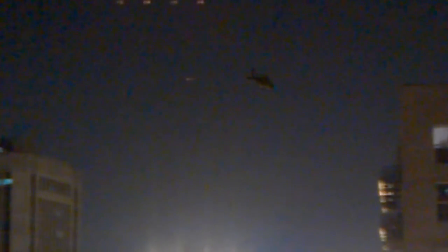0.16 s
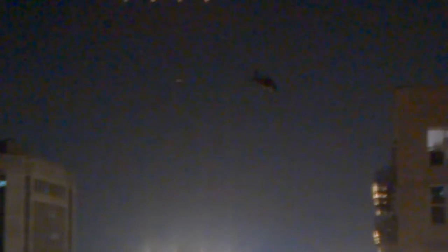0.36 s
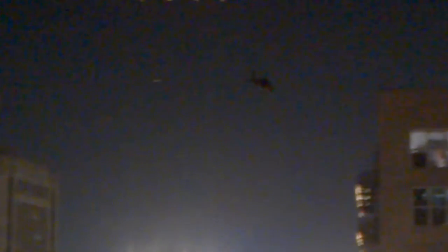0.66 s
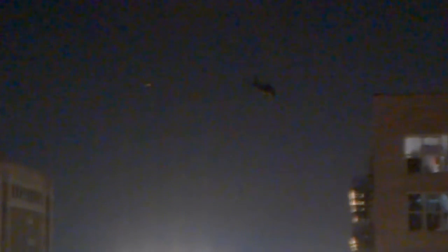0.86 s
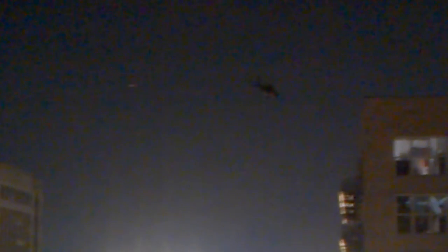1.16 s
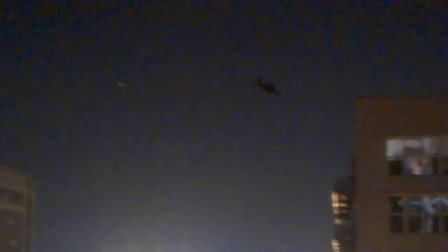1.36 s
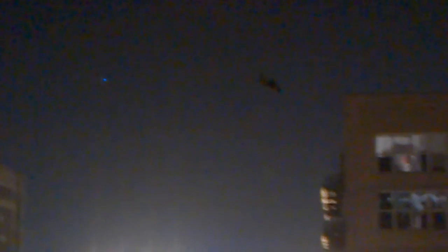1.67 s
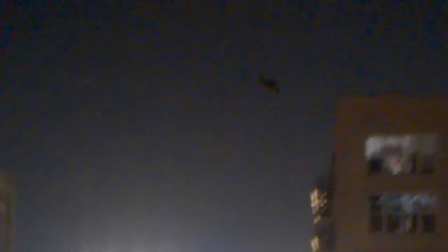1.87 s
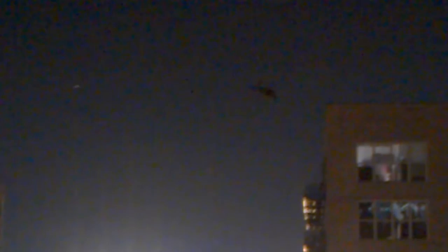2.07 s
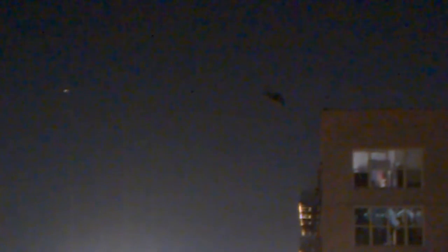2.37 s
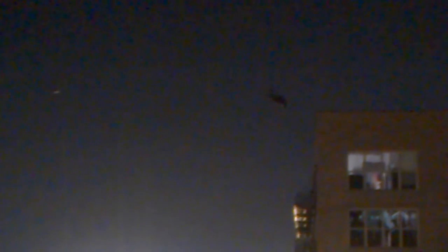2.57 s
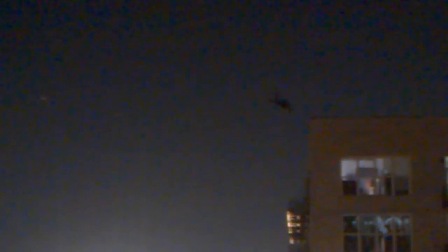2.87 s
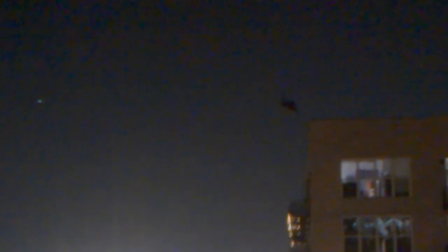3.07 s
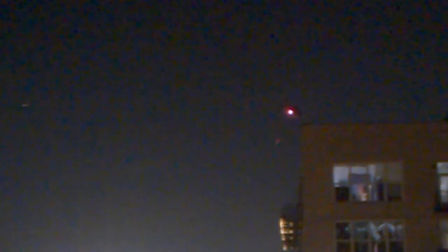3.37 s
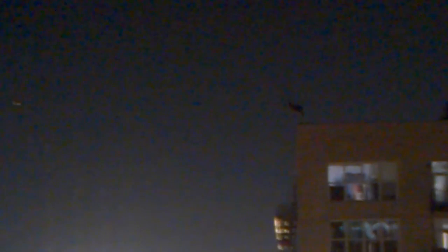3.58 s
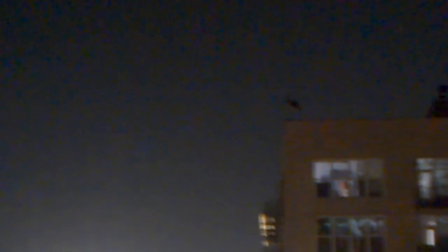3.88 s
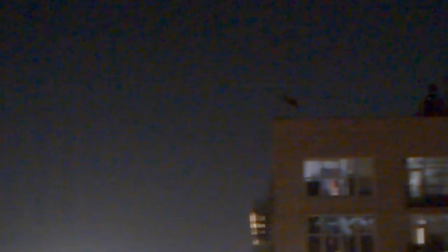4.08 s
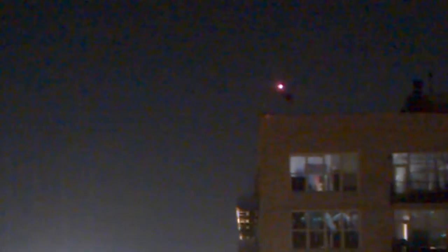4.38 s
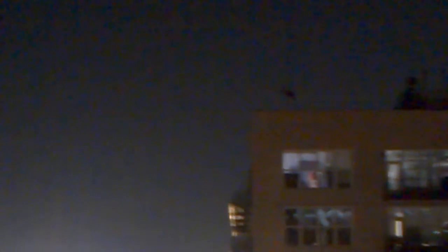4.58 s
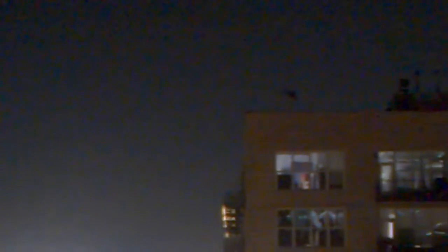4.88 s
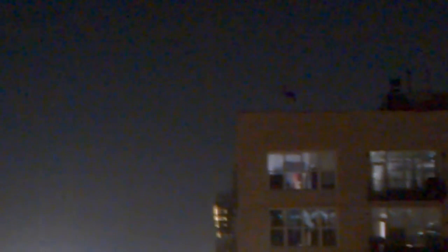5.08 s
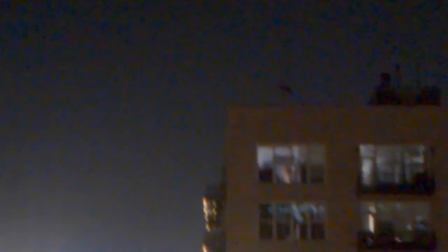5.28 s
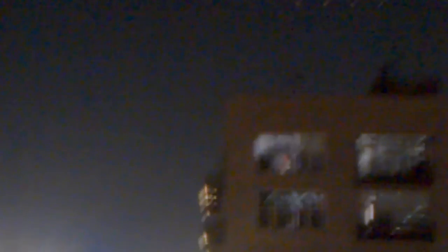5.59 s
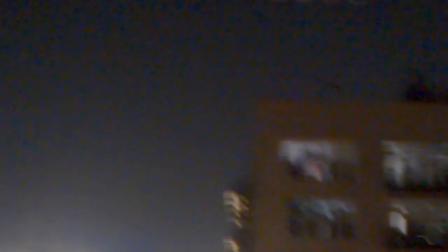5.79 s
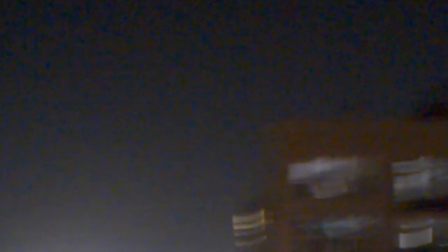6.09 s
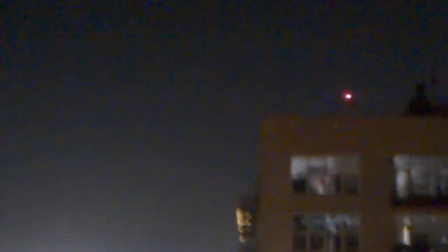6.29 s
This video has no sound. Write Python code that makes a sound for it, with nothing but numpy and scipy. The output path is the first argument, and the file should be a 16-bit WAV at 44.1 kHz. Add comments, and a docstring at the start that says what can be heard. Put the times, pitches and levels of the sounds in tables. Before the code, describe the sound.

A helicopter passes low over city buildings at night, heard from a balcony on a small mono camera. Its broad, rushing roar stays loud, with a soft fast chop and wavering low hums. Below, a heavy vehicle pulls away, its engine tone climbing until a gear change past four seconds. The hiss brightens midway, then dulls, and light wind puffs the microphone.

```python
"""Helicopter low over a city at night

A helicopter crosses low over a city, heard by a small camera on a balcony. Its broad roar is
noise with a moving colour, heard straight and again off the wall close by.
Rotor tones waver under it, and a heavy vehicle made of wavering tones pulls away and changes gear.
Light wind, low noise with a few puffs, brushes the microphone."""
import sys
import numpy as np
from scipy import signal
from scipy.io import wavfile
from scipy.ndimage import uniform_filter1d

SR = 44100
rng = np.random.default_rng(int(sys.argv[2]) if len(sys.argv) > 2 else 0)


def master_out(mix):
    """Clip the mix to full scale and print it as 16-bit PCM to the path in sys.argv[1]."""
    frames = np.transpose(np.atleast_2d(mix))
    ceiling = np.clip(frames, -1, 1)
    pcm = np.round(ceiling * 32767).astype(np.int16)
    wavfile.write(sys.argv[1], SR, pcm)


N = 286205
TIME_S = np.arange(N) / SR


def undb(db):
    """Turn decibels into gain."""
    return 10 ** (np.asarray(db) / 20)


def curves(table):
    """Draw straight lines between the rows: one value per sample for each column after the time."""
    s, *columns = np.transpose(table)
    return [np.interp(TIME_S, s, column) for column in columns]


def fade(start, end, edge=0.04):
    """Gain that is 1 between two times and slopes to 0 outside."""
    return np.clip(np.minimum(TIME_S - start, end - TIME_S) / edge + 1, 0, 1)


def span(table):
    """Let a sound through from the first to the last time of its table, with short slopes outside."""
    return fade(table[0][0], table[-1][0])


def walk(rate):
    """Smooth random wandering: levels held for 1 / rate seconds, then smoothed twice; spread near 1."""
    k = int(SR / rate)
    steps = np.repeat(rng.standard_normal(N // k + 1), k)
    return uniform_filter1d(uniform_filter1d(steps, k), k)[:N] * 4 / 3


def bumps(times, width_s):
    """One bell-shaped rise and fall per time, peak 1."""
    return np.exp(-((TIME_S - np.asarray(times)[:, None]) / width_s) ** 2)


def tone(hz, db, waver_db=0.0, drift_hz=0.436, blur_rad=0.0):
    """A sine of given rms level whose pitch drifts and whose level can waver in the moving air."""
    turns = np.cumsum(hz + drift_hz * walk(6.1)) / SR + rng.random()
    phase = 2 * np.pi * turns + blur_rad * walk(45)
    return np.sqrt(2) * undb(db + waver_db * walk(26)) * np.sin(phase)


def family(hz, table, orders):
    """Tones at multiples of one pitch, sounding over the span of the level table."""
    return sum(tone(k * hz, db) for k, db in zip(orders, curves(table))) * span(table)


# steady wind on the microphone: t/s, level/dB
WIND = [(0.0, -46), (1.2, -49.5), (2.1, -55), (3.0, -49), (3.6, -54), (4.3, -45), (6.49, -54)]
# puffs of wind: t/s, peak level/dB
PUFFS = [(1.68, -51), (3.67, -33), (4.42, -42), (3.83, -35), (3.99, -48), (4.48, -42), (5.15, -43),
         (5.77, -40), (5.87, -41)]
PUFF_S = 0.011  # from the peak to about a third of it


def wind(low_hz=30, high_hz=90, buffet_db=-2.0):
    """Low buffeting at the microphone port, with a few stronger puffs."""
    band = signal.butter(2, [low_hz, high_hz], "bandpass", fs=SR, output="sos")
    rumble = signal.sosfilt(band, rng.standard_normal(N))
    steady = undb(curves(WIND)[0] + buffet_db * walk(14))
    s, peak_db = np.transpose(PUFFS)
    puffs = undb(peak_db) @ bumps(s, PUFF_S)
    return rumble / np.std(rumble) * (steady + puffs)


# a thin high whine that wavers: t/s, f/Hz, level/dB
THIN = [(4.1, 928, -35), (4.22, 920, -39), (4.4, 925, -41), (4.9, 937, -39), (5.12, 932, -38),
        (5.3, 930, -38), (5.45, 915, -42), (5.6, 922, -32), (5.77, 927, -47), (5.92, 927, -32),
        (6.05, 956, -45), (6.2, 943, -38), (6.49, 938, -35)]


def thin_whine():
    """A thin tone, broken and smeared into the roar by fast random shifts of its phase."""
    return tone(*curves(THIN), waver_db=1.5, drift_hz=12, blur_rad=1.6) * span(THIN)


# a low drone that comes out now and then: t/s, f/Hz, level/dB
DRONE = [(2.3, 248, -55), (2.5, 254.7, -29.5), (2.65, 257, -43), (2.95, 259, -38), (3.2, 260, -58),
         (3.48, 262.4, -34), (3.9, 264.7, -55), (4.3, 266.6, -43), (4.6, 268, -47), (4.791, 268, -30.5),
         (4.9, 266, -48)]


def drone():
    """A low tone with a slowly moving pitch."""
    return tone(*curves(DRONE), waver_db=-1.0, drift_hz=1.44) * span(DRONE)


# driveline whine: t/s, level/dB
WHINE = [(3.15, -40), (3.25, -31), (3.34, -46), (3.5, -34), (3.75, -34), (3.9, -32), (4.2, -34.5),
         (4.3, -37), (4.4, -38), (4.6, -36.5), (4.75, -31), (4.87, -33.5), (4.95, -52)]
WHINE_FROM_S, WHINE_HZ, WHINE_HZ_PER_S = 3.15, 385, 12.5
WHINE_WANDER_HZ, WHINE_FLUTTER_HZ = 1.445, 2  # slow and fast unsteadiness


def driveline_whine():
    """Driveline tone: rises steadily with road speed, fades out soon after the gear change begins."""
    hz = WHINE_HZ + WHINE_HZ_PER_S * (TIME_S - WHINE_FROM_S)
    hz = hz + WHINE_WANDER_HZ * walk(14) + WHINE_FLUTTER_HZ * walk(50)
    return family(hz, WHINE, (1,))


# strongest engine order, a tone tied to the engine's turning: t/s, level/dB
ENGINE = [(0.0, -47), (0.9, -45.5), (1.42, -44), (1.55, -35), (1.75, -31), (2.28, -29.5), (2.42, -37),
          (2.5, -34.5), (2.58, -35), (2.75, -29.5), (3.1, -28.5), (3.24, -39), (3.4, -27), (3.62, -30),
          (3.75, -34), (3.93, -30), (4.05, -36), (4.12, -32), (4.24, -37.5), (4.4, -28), (4.56, -39.5),
          (4.7, -32), (4.78, -38), (4.92, -42), (5.02, -35), (5.1, -34), (5.28, -41), (5.4, -33),
          (5.55, -36.5), (5.88, -30.5), (6.1, -39.5), (6.49, -38.5)]
# other orders that come out for a while: multiple of the strongest order, from t/s, to t/s, level/dB
UPPER = [(1 / 2, 5.5, 5.9, -40), (1 / 2, 6.15, 6.6, -38), (3 / 2, 1.2, 2.2, -40), (3 / 2, 2.5, 2.95, -38),
         (3 / 2, 3.3, 3.95, -41), (3 / 2, 6.2, 6.6, -40), (7 / 4, 6.0, 6.6, -44), (2, 6.05, 6.6, -41),
         (9 / 4, 6.1, 6.6, -46), (5 / 2, 5.35, 6.32, -39)]
# the strongest order creeps, pulls, drops at the gear change, creeps again
START_HZ, CREEP_HZ_PER_S, PULL_FROM_S, PULL_HZ_PER_S = 259.2, 4.3, 1.05, 11.2
SHIFT_S, SHIFT_LENGTH_S, SHIFTED_HZ, SHIFTED_HZ_PER_S = 4.6, 0.47, 262.5, 1.75
ENGINE_WAVER_DB, ENGINE_BLUR_RAD = 2.5, 0.4  # roughness of the strongest order


def vehicle():
    """Firing orders climb, drop at the gear change and climb again, with whines and a drone."""
    creep_hz = CREEP_HZ_PER_S * np.minimum(TIME_S, PULL_FROM_S)
    pull_hz = PULL_HZ_PER_S * np.maximum(TIME_S - PULL_FROM_S, 0)
    low_gear = START_HZ + creep_hz + pull_hz
    high_gear = SHIFTED_HZ + SHIFTED_HZ_PER_S * (TIME_S - SHIFT_S - 1)
    shifted = np.clip((TIME_S - SHIFT_S) / SHIFT_LENGTH_S, 0, 1)
    hz = low_gear + shifted * (high_gear - low_gear)
    strongest = tone(hz, curves(ENGINE)[0], ENGINE_WAVER_DB, drift_hz=1.65, blur_rad=ENGINE_BLUR_RAD)
    others = sum(tone(k * hz, db, waver_db=1.0, drift_hz=1.197) * fade(start, end)
                 for k, start, end, db in UPPER)
    return strongest + others + driveline_whine() + thin_whine() + drone()


# two shaft hums that swell and sink: t/s, lower hum level/dB, higher hum level/dB
HUMS = [(0.5, -59, -69), (0.999, -47.5, -44.5), (1.65, -51, -39), (1.85, -52, -42), (2.05, -48, -40.5),
        (2.4, -41, -34.5), (2.6, -40, -37.5), (2.78, -38, -44), (3.0, -44, -38), (3.1, -44, -31.5),
        (3.45, -37, -36.5), (3.56, -39, -47), (4.0, -45, -49), (4.2, -50, -35), (4.48, -35, -45),
        (4.75, -43, -38), (5.15, -41.5, -40), (5.6, -53, -47), (6.0, -42, -42), (6.49, -58, -45)]
# overtones of the lower hum: multiple, level against it/dB
HUM_OVERTONES = [(2, -2), (5, -3)]
HUM_LOW_HZ, HUM_HIGH_HZ, HUM_SAG_FROM_S, HUM_SAG_HZ_PER_S = 105.4, 114.7, 4.2, 1.61
RUMBLE_HZ, RUMBLE_DB, RUMBLE_FADE_DB_PER_S = 33, -56.5, 3.7


def shaft_hums():
    """Two shaft hums, the higher one sagging late, over a deep unsteady hum that fades."""
    low_db, high_db = curves(HUMS)
    low = tone(HUM_LOW_HZ, low_db, drift_hz=0.98)
    overtones = sum(tone(k * HUM_LOW_HZ, low_db + rel_db, drift_hz=k * 0.92)
                    for k, rel_db in HUM_OVERTONES)
    high_hz = HUM_HIGH_HZ - HUM_SAG_HZ_PER_S * np.maximum(TIME_S - HUM_SAG_FROM_S, 0)
    high = tone(high_hz, high_db, waver_db=2.5)
    rumble_db = RUMBLE_DB - RUMBLE_FADE_DB_PER_S * TIME_S
    rumble = tone(RUMBLE_HZ, rumble_db, waver_db=2.5, drift_hz=2.5)
    return (low + overtones + high + rumble) * span(HUMS)


# tail rotor: t/s, 1st tone level/dB, 2nd tone level/dB, 3rd tone level/dB
TAIL = [(0.0, -43, -50, -43), (0.2, -46, -38.5, -46), (0.35, -45, -36, -41), (0.58, -46, -35.5, -42),
        (0.75, -49, -43.5, -41), (1.3, -52, -40, -38), (2.2, -55, -47, -42), (2.75, -44, -43, -44),
        (3.3, -53, -43, -55), (3.6, -47, -40, -59), (4.2, -45, -43.5, -40), (4.6, -48, -36.5, -50),
        (5.3, -54, -49, -47), (5.7, -53, -41.5, -42), (6.49, -50, -42, -48)]
# second rotating family: t/s, 1st level/dB, 2nd level/dB, 3rd level/dB, 6th level/dB
FAN = [(0.0, -55, -50, -41, -36.5), (0.55, -38.5, -38.5, -35.5, -46), (0.75, -43, -41, -44, -48),
       (1.2, -42, -39, -45, -43), (2.2, -44.5, -58, -55, -46.5), (3.0, -53, -60, -61, -49)]
# faint gear whine inside the roar: t/s, level/dB
GEAR = [(0, -44), (0.25, -43), (0.38, -37), (0.55, -41), (0.75, -45), (0.95, -42), (1.3, -48)]
TAIL_HZ, TAIL_SAG_HZ_PER_S = 75.73, 0.3  # blade rate sinks as the machine draws away
FAN_HZ, GEAR_HZ = 91.6, 1755


def rotor():
    """Tail rotor blade tones, a second rotating family, a gear whine and shaft hums."""
    tail = family(TAIL_HZ - TAIL_SAG_HZ_PER_S * TIME_S, TAIL, (1, 2, 3))
    fan = family(FAN_HZ, FAN, (1, 2, 3, 6))
    gear = family(GEAR_HZ + 3 * walk(12), GEAR, (1,))
    return tail + fan + gear + shaft_hums()


# main blade passes: lift of each before smoothing, its scatter, decay as share of a pass
BLADE_HZ, CHOP_DB, CHOP_SCATTER, CHOP_FALL = 15.0, 1.4, 0.46, 0.32


def chop():
    """Each main blade pass lifts the roar suddenly by an uneven amount; the lift dies before the next."""
    turns = np.cumsum(BLADE_HZ * (1 + 0.06 * walk(6.5))) / SR
    size = np.maximum(1 + CHOP_SCATTER * rng.standard_normal(N // 1000), 0)
    lift = size[turns.astype(int)] * np.exp(-(turns % 1) / CHOP_FALL)
    return CHOP_DB * uniform_filter1d(lift - np.mean(lift), size=150)


# the hiss jumps or drops: t/s, change/dB when the treble is fully open
HISS_JUMPS = [(3.185, 10), (3.585, -7), (3.62, 5), (3.725, -6), (3.85, 3), (4.19, 3), (4.605, 9)]
HISS_JUMP_S = 0.011  # from the peak to about a third of it
THROB_HZ, THROB_AT_S = 14.25, 4.106  # rate, time of one crest
THROB_DB, THROB_SCATTER = 2, 0.51  # middle depth when fully open, its scatter


def throb():
    """Even beat of the hiss in dB, crests of uneven height, with a few jumps and drops."""
    turns = THROB_HZ * (TIME_S - THROB_AT_S)
    depth_db = THROB_DB * np.maximum(1 + THROB_SCATTER * walk(THROB_HZ), 0)
    s, jump_db = np.transpose(HISS_JUMPS)
    return depth_db * np.cos(2 * np.pi * turns) + jump_db @ bumps(s, HISS_JUMP_S)


# two coloured bands in the hiss: t/s, lower f/Hz, lower level/dB, upper f/Hz, upper level/dB
HISS_BANDS = [(0, 3670, 0.5, 5800, 5), (0.5, 3700, 0, 5270, 3.5), (1.2, 3700, 1, 5830, -1),
              (2.5, 3750, 1, 5900, -1), (3.1, 3800, -1, 5900, 1.5), (3.3, 4900, 2, 6300, 2),
              (3.45, 4700, -1, 6350, 3.5), (3.6, 3900, -0.5, 6350, 1.5), (4.2, 3850, 2.5, 6300, 4.5),
              (4.6, 3800, 3, 6250, 5.5), (5.0, 3804, 3, 6005, 1), (5.7, 3830, 2, 5500, -1),
              (5.85, 3900, 3.5, 5500, 1), (6.05, 4010, 0, 5880, 1), (6.49, 4100, -4, 6070, 1)]
HISS_BAND_WIDTH_HZ, THROB_CENTRE_HZ, THROB_WIDTH_HZ = 270, 6300, 1360


def hiss_colour(hz, at, opened):
    """Lift in dB from two bands that shift and fade, and from the throb once the treble is open."""
    low_hz, low_db, high_hz, high_db = curves(HISS_BANDS)
    lower = low_db[at] * np.exp(-((hz - low_hz[at]) / HISS_BAND_WIDTH_HZ) ** 2)
    upper = high_db[at] * np.exp(-((hz - high_hz[at]) / HISS_BAND_WIDTH_HZ) ** 2)
    throb_band = np.exp(-((hz - THROB_CENTRE_HZ) / THROB_WIDTH_HZ) ** 2)
    return lower + upper + (opened * throb()[at]) * throb_band


# how far two narrow bands of the roar stand out: t/s, lower level/dB, upper level/dB
NARROW_BANDS = [(0, -1, 3), (1.2, -0.5, -0.5), (2.1, 0, -1.5), (2.5, 2.5, 0), (3.0, 3, 3.5),
                (3.7, 3.5, 2.5), (4.2, 2, -1.5), (4.85, 2.5, -1), (5.5, 0.5, -2), (6.49, 4.5, 1.5)]
# brief swells and dips of the lower band: t/s, change/dB, half length/s
BAND_SWELLS = [(0.306, 5, 0.014), (0.43, 9.5, .04), (1.0, 5, .015), (1.071, 10, .016), (1.11, -9, .02),
               (1.9, -3, .03), (2.04, 0, 0.025), (2.358, 2.5, 0.036), (2.855, 5, 0.018), (3.43, 4, .02),
               (4.214, 4.5, 0.046), (4.56, 5, .02)]
LOWER_BAND_HZ, LOWER_WIDTH_HZ, LOWER_NARROWS_HZ_PER_S = 938, 87, 5.5
UPPER_BAND_HZ, UPPER_WIDTH_HZ = 1710, 50


def narrow_band_colour(hz, s, at):
    """Lift in dB from two narrow bands of the roar that stand out, near 940 and 1710 Hz."""
    lower_db, upper_db = curves(NARROW_BANDS)
    swell_s, swell_db, swell_half_s = np.transpose(BAND_SWELLS)
    lower_db = lower_db + swell_db @ bumps(swell_s, swell_half_s[:, None])
    width_hz = LOWER_WIDTH_HZ - LOWER_NARROWS_HZ_PER_S * s
    lower = lower_db[at] / (1 + ((hz - LOWER_BAND_HZ) / width_hz) ** 2)
    upper = upper_db[at] / (1 + ((hz - UPPER_BAND_HZ) / UPPER_WIDTH_HZ) ** 2)
    return lower + upper


# echo off the wall as the camera turns: t/s, lag/ms, share before filtering/0-1
WALL = [(0, 1.1, .1), (3, 1.07, .13), (4, 1.07, .08), (4.6, 1.05, .14), (5.1, 1.05, .07), (5.5, 1.06, .1),
        (5.7, 1.06, .24), (5.97, 1.03, .32), (6.1, 1.0, .14), (6.49, .96, .16)]
# later echo as the machine nears the roof edge: t/s, lag/ms, share before filtering/0-1
ROOF = [(6.05, 2.4, 0), (6.2, 2.27, .24), (6.3, 2.2, .16), (6.49, 1.95, .24)]
# what the wall mirrors: lowest f/Hz, highest f/Hz
WALL_BAND_HZ = (2300, 6500)


def wall_echo(direct):
    """Delayed copies of the roar; a small, rough patch of wall mirrors neither the bass nor the top."""
    sample = np.arange(N)
    echo = sum(share * np.interp(sample - lag_ms * SR / 1000, sample, direct)
               for lag_ms, share in (curves(WALL), curves(ROOF)))
    band = signal.butter(1, WALL_BAND_HZ, "bandpass", fs=SR, output="sos")
    return signal.sosfiltfilt(band, echo)


# roar as heard: t/s, level/dB, bass lift/dB, treble lift/dB
ROAR = [(0.0, -23.5, 6.5, -5.5), (0.45, -22.5, 3.5, -6), (1.0, -22.5, 3.5, -8.5), (1.7, -22, 1.5, -9),
        (2.25, -22.5, 1.5, -7.5), (2.55, -21, -2.5, -6.5), (2.9, -23, 2.5, -3), (3.25, -23.5, 1.5, -3),
        (3.4, -23, -1, -0.5), (3.58, -24, 4.5, -1), (3.74, -24, 3.5, -2.5), (3.8, -24.5, 3, 1.5),
        (3.97, -25, 5.5, 0.5), (4.1, -22.5, -0.5, 0.5), (4.22, -24, 3, -0.5), (4.33, -24.5, 5, 1),
        (4.45, -24, 4, -0.5), (4.62, -23.5, 4.5, -3), (4.82, -22, -2, -1.5), (4.97, -24, 0.5, -5.5),
        (5.3, -23, -1.5, -6.5), (5.62, -23, -4.5, -6), (5.9, -24.5, -2, -2), (6.2, -22.5, -5, -2.5),
        (6.49, -25, 1.5, 0)]
# basic colour of the roar, only its shape counts: f/Hz, level per Hz/dB
ROAR_COLOUR = [(40, -34), (60, -22), (82, -16), (98, -13.5), (182, -5), (265, -3.5), (338, -5.5), (680, -5),
               (960, -1.5), (1220, -5.5), (1780, -3), (1970, -5.5), (2150, -6.5), (2380, -9.5),
               (2800, -11.5), (3200, -14.5), (3700, -14.5), (4300, -15.5), (5600, -16.5), (6300, -18.5),
               (7000, -22), (8200, -31.5), (12300, -45)]
BASS_KNEE_HZ, TREBLE_KNEE_HZ, TREBLE_POWER, TREBLE_SLOPE = 404, 3480, 2.9, 0.45
# moving top edge of the hiss: at least, at no lift, per dB of lift
EDGE_LEAST_HZ, EDGE_HZ, EDGE_HZ_PER_DB = 8060, 10880, 420.5
OPEN_GUST_DB, OPEN_FROM_DB, OPEN_SPAN_DB = 0.15, -6, 6  # the treble gusts harder once it is open


def roar(flicker_db=0.43, top_flicker_db=0.2, gust_db=0.38, edge_waver_db=1.5, beyond_db_per_khz=90):
    """Turbine and blade noise; its treble fades and opens; the wall echoes it."""
    level_db, bass_db, treble_db = curves(ROAR)
    # cut the noise into short overlapping frames: rows are pitches, columns are times
    hz, s, noise = signal.stft(rng.standard_normal(N), SR, nperseg=1024, noverlap=768)
    hz = hz[:, None]
    at = np.minimum((s * SR).astype(int), N - 1)
    octave = np.log2(np.maximum(hz, 1))
    colour_hz, colour_level_db = np.transpose(ROAR_COLOUR)
    colour_db = np.interp(octave, np.log2(colour_hz), colour_level_db, left=-60)

    low = 1 / (1 + (hz / BASS_KNEE_HZ) ** 2)
    high = 1 - 1 / (1 + (hz / TREBLE_KNEE_HZ) ** TREBLE_POWER)
    high = high * (hz / TREBLE_KNEE_HZ) ** TREBLE_SLOPE  # the highest pitches come and go the most
    opened = np.clip((treble_db - OPEN_FROM_DB) / OPEN_SPAN_DB, 0, 1)

    # turbulence: every third of an octave flickers alone, the treble also gusts together
    flicker = sum(np.clip(1 - np.abs(3 * octave - k), 0, 1) * walk(22)[at] for k in range(16, 43))
    flicker = (flicker_db + top_flicker_db * high) * flicker
    gusty_treble_db = treble_db + (gust_db + OPEN_GUST_DB * opened) * walk(24.04)

    moving_db = low * bass_db[at] + high * gusty_treble_db[at] + flicker
    moving_db = moving_db + narrow_band_colour(hz, s, at) + hiss_colour(hz, at, opened[at])
    edge_hz = EDGE_HZ + EDGE_HZ_PER_DB * (treble_db + edge_waver_db * walk(22))
    edge_hz = np.maximum(EDGE_LEAST_HZ, edge_hz)
    lost_db = beyond_db_per_khz * np.maximum(hz - edge_hz[at], 0) / 1000

    coloured = noise * undb(colour_db + moving_db - lost_db)
    direct = signal.istft(coloured, SR, nperseg=1024, noverlap=768)[1][:N]
    direct /= np.sqrt(np.mean(undb(colour_db) ** 2))  # the basic colour alone would have rms 1
    return undb(level_db + chop()) * (direct + wall_echo(direct))


def scene():
    """Everything that reaches the single microphone."""
    return (wind() + vehicle() + rotor() + roar())[None]


TOP_HZ = 12300


def record(dry):
    """The camera cuts the top: a steep filter removes what lies above its highest pitch."""
    return signal.sosfilt(signal.ellip(8, .2, 70, TOP_HZ, fs=SR, output="sos"), dry)


dry = scene()
out = record(dry)
master_out(out)
```